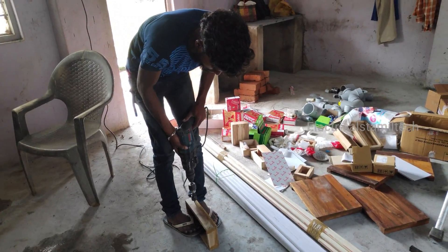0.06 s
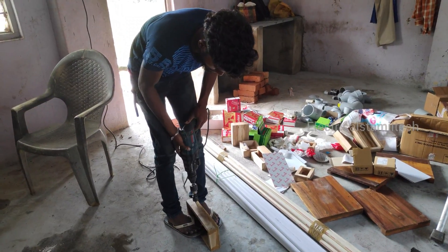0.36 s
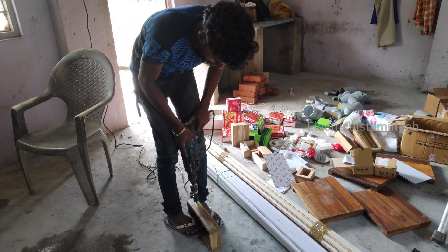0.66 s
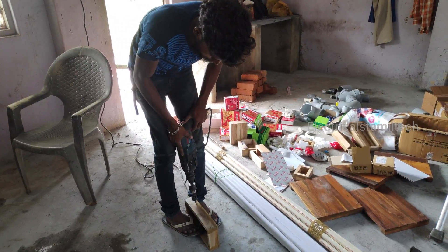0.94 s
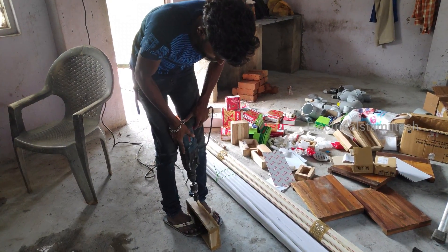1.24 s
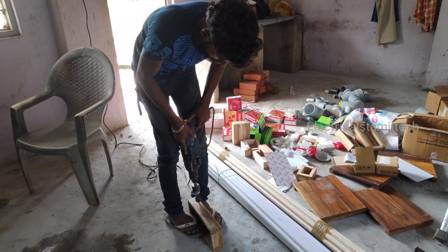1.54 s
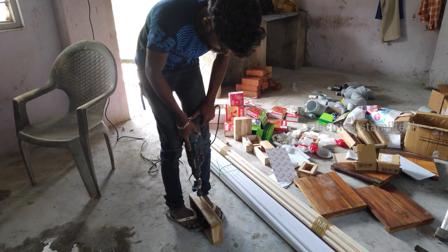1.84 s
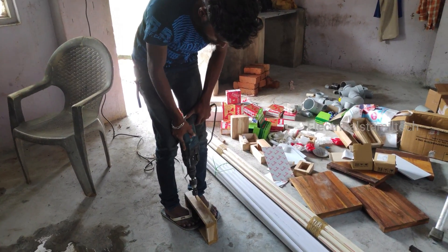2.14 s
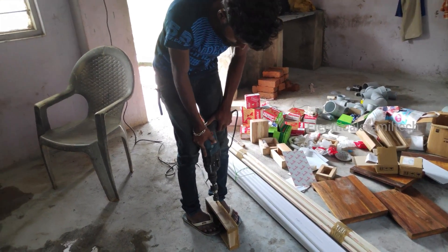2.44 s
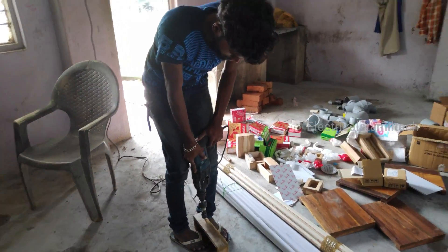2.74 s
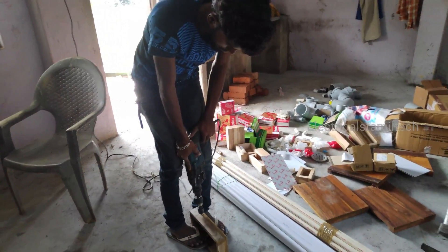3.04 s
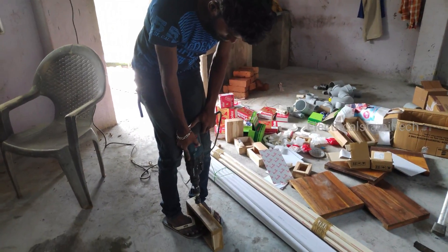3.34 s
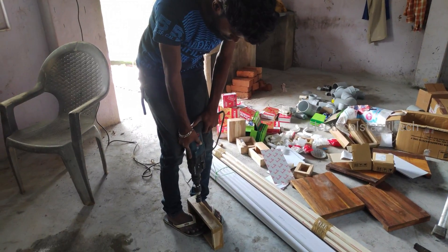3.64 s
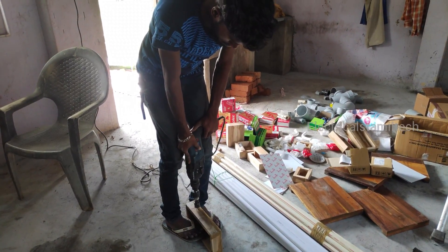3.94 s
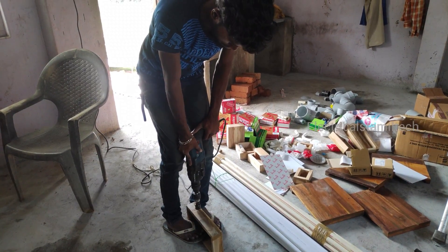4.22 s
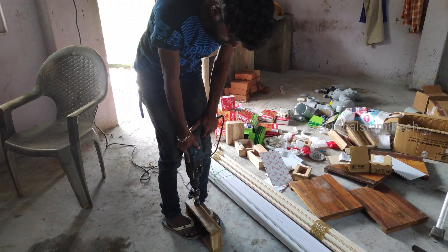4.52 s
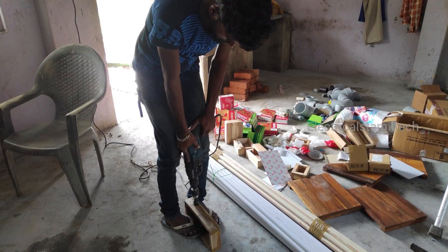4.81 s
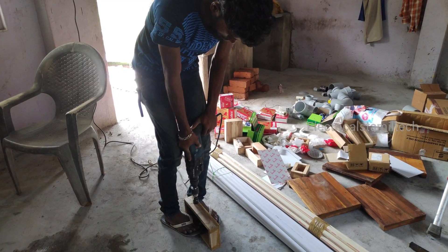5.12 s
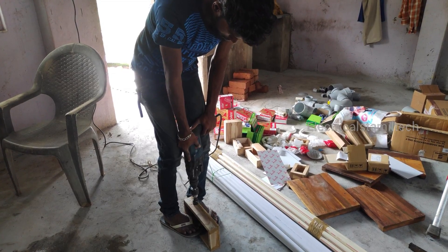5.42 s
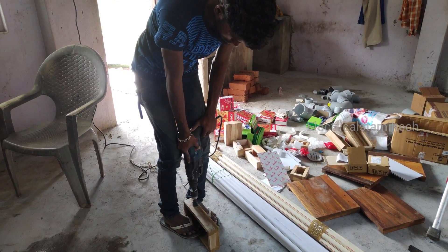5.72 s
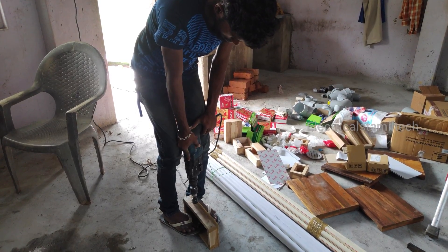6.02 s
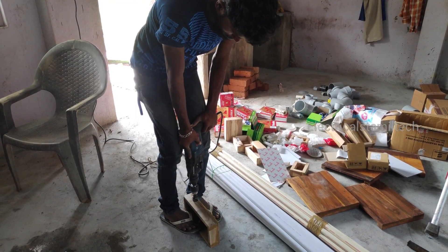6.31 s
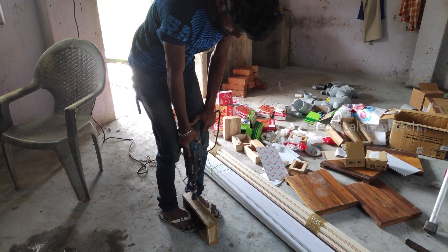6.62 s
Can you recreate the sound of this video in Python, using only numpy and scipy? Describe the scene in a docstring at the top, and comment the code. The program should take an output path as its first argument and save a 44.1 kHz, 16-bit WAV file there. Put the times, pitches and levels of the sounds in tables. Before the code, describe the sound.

Quiet room air and faint hums open in a bare concrete room. At about 0.4 seconds a blip of a corded drill's trigger jerks the gears with a double knock, and the rotor coasts with a soft hiss. Around 1.4 seconds come a soft bump and a few dry, close ticks.

At 1.9 seconds the drill starts with a knock and runs up into a loud whine with rattling gears and hissing air. Its hole saw bites into a plastic box near 2.5 seconds; the pitch sags, recovers with a brief chirp, and sags again around 3.2 seconds. A thin, high squeal passes just before 4 seconds. The teeth rasp on, and the box rings more from about 4.7 seconds. After another dip near 5.3 seconds, the whine holds steady until the end at about 6.8 seconds. The walls give a short reverberation.

```python
"""In a bare concrete room, a corded drill with a hole saw cuts into a plastic box on the floor.
A blip of the trigger jerks the gears and the rotor coasts; then the motor runs up, sags and settles.
Pinion and rotor whine at harmonics of the shaft speed, and slack gear teeth rattle their case.
The saw teeth rasp and excite the modes of the box, brushes and cooling air hiss, a chirp and a squeal
pass. The walls reverberate; dry ticks, quiet room air, faint hums and a soft bump lie beneath."""
import sys
import numpy as np
from scipy import signal
from scipy.fft import rfft, irfft
from scipy.io import wavfile
from scipy.ndimage import uniform_filter1d

SR = 44100
rng = np.random.default_rng(int(sys.argv[2]) if len(sys.argv) > 2 else 0)


def wav_record(signal):
    """Record a signal, one row per channel, as 16-bit PCM in the file named by sys.argv[1]."""
    frames = np.transpose(np.atleast_2d(signal))
    bounded = np.clip(frames, -1, 1)
    # unit amplitude maps onto the largest positive 16-bit level
    quanta = np.round(bounded * 32767).astype(np.int16)
    wavfile.write(sys.argv[1], SR, quanta)


N = 298116
T = np.arange(N) / SR
BINS = np.maximum(np.arange(N // 2 + 1) * SR / N, 1)  # Hz
PINION_TEETH, WHEEL_TEETH = 7, 36
FULL_HZ = 332  # working speed of the shaft

# Motor speed, set by the trigger and the drag of the saw. Each row: time in seconds, shaft speed in Hz.
SHAFT_SPEED = [(1.92, 24.27), (2.25, 283.4), (2.55, 158.4), (2.7, 206.3), (2.94, 343.5), (3.17, 215.8),
               (3.39, 270.6), (3.51, 323.6), (3.61, 317.4), (3.97, 370), (4.12, 306.7), (4.24, 341.7),
               (4.4, 361.3), (4.72, 367.4), (4.85, 353), (5.08, 362.7), (5.19, 299), (5.34, 243.3),
               (5.51, 319), (5.74, 340.1), (5.98, 343), (6.15, 337.1), (6.52, 345.6), (6.76, 346)]
RUN_START_S = SHAFT_SPEED[0][0]
# As the saw sinks in, the box rings more and the gears run steadier.
# Each row: time in seconds, box ring in dB, gear chatter from 0 to 1, change of gear whine in dB.
CUT_PROGRESS = [(2.3, -47, 0.7, 2.5), (3.25, -47, 0.7, -2), (3.6, -38.5, 0.38, -0.5),
                (3.85, -42.5, 0.5, -1.5), (4.68, -34, 0.28, -1.5), (4.82, -30, 0.29, -1.5),
                (5.5, -29, 0.41, 0.7), (5.9, -30, 0, 2.2), (6.45, -30.5, 0.15, 0), (6.76, -31.5, 0, 5.5)]
# Spectrum of scraping and hiss. Each row: frequency in Hz, spectral level in dB.
RASP_SPECTRUM = [(50, -46), (110, -21.5), (400, -11.5), (620, -4), (800, -3.5), (1250, -3), (1650, -6.5),
                 (2100, -2.5), (2600, -1.5), (3100, -7.5), (3600, -10.5), (4900, -5), (5800, -7.5),
                 (7200, -6.5), (9200, -12), (11300, -10), (15500, -18)]
SCRAPE_BAND = 1 / np.sqrt(1 + (BINS / 3000) ** 6)  # scraping lies below 3 kHz, hiss above


def gear_whine(hz, angle, throb=0.27, sway_rad=0.18, blur_hz=100, flutter_db=1.08):
    """Gear meshing: an eccentric wheel modulates the tooth harmonics in amplitude and phase."""
    # Each row: multiple of the shaft speed, level in dB, blur from 0 to 1.
    orders = [(7, -1.5, 0), (14, -19, 1), (21, -17, 1)]
    _, _, gear_db = curves(CUT_PROGRESS)
    chatter, _ = slack(hz)
    wheel = angle * PINION_TEETH / WHEEL_TEETH + 0.26 * wander(5.4)
    mesh = angle + sway_rad * np.sin(wheel + .5) / PINION_TEETH
    tones = sum(undb(db) * partial(k * mesh, blur + 0.95 * chatter, blur_hz, apart=0.95)
                for k, db, blur in orders)
    modulation = (1 + throb * np.cos(wheel)) * undb(gear_db + flutter_db * wander(5.3))
    return tones * modulation * speed_gain(hz, db=-19, db_per_octave=36, limit_hz=298.5, free_db=-26)


def rotor_whine(hz, angle, blur_hz_per_order=50 / 16, smooth_above_hz=310):
    """Periodic forcing: the rotor, its slots and its fan radiate shaft harmonics through the housing."""
    # Each row: multiple of the shaft speed (rounded in use), level in dB, blur from 0 to 1.
    orders = [(0.9988, -27, 0.57), (2, -17.5, 0.3), (3, -32, 0), (4, -15.5, 0), (6, -14.5, 0.6),
              (8, -15, 0.1), (10, -18.5, 0.2), (12, -16.5, 0), (16, -2.5, 0.13), (18, -28, 0.4),
              (20, -13, 0.9), (22, -25, .4), (24, -15, .3), (31, -17, 1), (32, -11.5, 0.56)]
    # Radiation from the housing. Each row: frequency in Hz, gain in dB.
    housing = [(2800, -0.5), (3600, -4), (4120, 3), (4380, -7), (4700, 3.5), (5300, -1.4), (5900, -1.5),
               (7000, -3), (9800, -13.5), (11300, 1)]
    chatter, slowing = slack(hz)
    slow = np.clip(1 - hz / smooth_above_hz, 0, 1)
    uneven = angle + .3 * slow * wander(220)  # a slow rotor turns unevenly, fraying its high partials
    tones = sum(
        undb(db) * partial(round(k) * uneven, blur + 0.12 * chatter, blur_hz_per_order * k, apart=2.07)
        for k, db, blur in orders)
    gain = speed_gain(hz, db=-23.5, db_per_octave=31, limit_hz=313, free_db=-6.5)
    return shape(tones, response(housing)) * gain * undb(-0.4 * slowing)  # softer while slowing


def saw_cut(hz, angle, rasp_from_hz=167):
    """Forced vibration: teeth tear the plastic in tiny bursts that rasp and ring the box, over a hum."""
    # A low hum near half the working shaft speed, then the ringing of the box.
    # Each row: frequency in Hz, bandwidth in Hz, level in dB.
    peaks = [(174.1, 8.5, -12.5), (344, 9.7, 0), (636, 23.5, 5), (678, 21, 2.5), (842, 190, -6.5),
             (991, 18, 6), (1330, 14, -25)]
    ring_db, _, _ = curves(CUT_PROGRESS)
    wheel = angle * PINION_TEETH / WHEEL_TEETH
    bite = undb(wander(14) + np.cos(wheel))
    scrape = unit(shape(wide_noise() * bite, response(RASP_SPECTRUM) * SCRAPE_BAND), (1080, 1400))
    scrape *= speed_gain(hz, db=-38, db_per_octave=5.5, limit_hz=351, free_db=-4.5)
    colour = sum(undb(db) * resonance(peak_hz, width_hz) for peak_hz, width_hz, db in peaks)
    ring = unit(shape(wide_noise() * bite, colour)) * undb(ring_db)
    return (scrape + ring) / (1 + (rasp_from_hz / hz) ** 6)  # slow teeth barely rasp


def brush_hiss(hz, angle, dull_db_per_octave=3):
    """Modulated noise: sparking brushes and cooling air hiss, pulsing twice a shaft turn."""
    sparks = undb(2 * wander(1500) + 0.65 * wander(21) + np.cos(2 * angle))
    colour = response(RASP_SPECTRUM) * np.sqrt(1 - SCRAPE_BAND ** 2)
    hiss = unit(shape(wide_noise() * sparks, colour), (7800, 15000))
    top = shape(hiss, 1 / (1 + (12000 / BINS) ** 8))
    top_gain = undb(-dull_db_per_octave * octaves_below(hz, FULL_HZ))  # a slow motor sounds duller
    hiss += top * (top_gain - 1)
    return hiss * speed_gain(hz, db=-30.5, db_per_octave=9, limit_hz=361, free_db=-6.5)


def gear_rattle(hz, angle, clatter_db=5, case_hz=2340, case_width_hz=690):
    """Backlash: slack teeth clatter once a shaft turn and excite the resonance of the gear case."""
    clatter = wide_noise() * undb(clatter_db * (wander(60) + np.cos(angle)))
    ring = unit(shape(clatter, resonance(case_hz, case_width_hz) ** 2))
    return ring * speed_gain(hz, db=-36.5, db_per_octave=9.5, limit_hz=334, free_db=0.5)


def short_tones(blur=0.93):
    """Narrowband transients swell and fade: a rising chirp, a brief gear chatter and a high squeal."""
    # Each row: start and length in seconds, first and last pitch in Hz, level in dB, blur width in Hz.
    tones = [(2.645, 0.0956, 2310, 2603, -27.5, 88), (3.445, 0.011, 2010, 2050, -17, 250),
             (3.727, 0.3, 5174, 5170, -21.5, 150.6)]
    out = np.zeros((2, N))
    for start_s, length_s, first_hz, last_hz, db, width_hz in tones:
        progress = np.clip((T - start_s) / length_s, 0, 1)
        hz = first_hz + (last_hz - first_hz) * progress
        tone = partial(2 * np.pi * np.cumsum(hz) / SR, blur, width_hz, apart=0.79)
        out += tone * undb(db) * np.sin(np.pi * progress)
    return out


def gear_jerks(knock_t60_s=0.048, body_db=-6):
    """Impact excitation: each start slams the teeth together, and body and cutter ring freely."""
    # Each row: start in seconds, level in dB, treble gain in dB, relative level of the ping in dB.
    impacts = [(.408, -35.5, -14, -40), (.468, -28.5, -5, -11), (1.915, -27.5, 0, -24),
               (1.936, -30.5, -1, -24)]
    # Each row: frequency in Hz, spectral level in dB.
    knock_spectrum = [(60, -12.5), (130, -4.5), (420, -1), (660, 4.5), (1000, -12), (1600, -5), (2400, -4),
                      (3300, -10.5), (5000, -10.5), (15500, -23.5)]
    # Drill body and steel cutter. Each row: frequency in Hz, level in dB, T60 in seconds.
    body_modes = [(520, -9, .4), (673, -7, .3), (964, -11, .15), (2379, -7, .25), (2584, -11, .25)]
    cutter_modes = [(10440, 0, 0.24), (15200, -12, .25)]
    noise = unit(shape(wide_noise(), response(knock_spectrum)))
    shake = 1.5 * wander(67)
    out = np.zeros((2, N))
    for start_s, db, treble_db, ping_db in impacts:
        age = np.maximum(T - start_s, 0)
        body = undb(body_db) * free_modes(body_modes, age, shake)
        ping = undb(ping_db) * free_modes(cutter_modes, age, shake)
        blow = (noise * decay(age, knock_t60_s) + body + ping) * (T >= start_s)
        out += undb(db) * shape(blow, response([(1000, 0), (3000, treble_db)]))
    return out


def brush_sizzle(crackle_db=3):
    """Arcing: the brushes give a fine, very high crackle when the current surges."""
    # Each row: time of the peak in seconds, half width in seconds, level in dB.
    surges = [(2.04, 0.11, -43.5), (2.399, .035, -36), (2.7, 0.097, -37)]
    swell = sum(undb(db) * np.exp(-((T - peak_s) / width_s) ** 2) for peak_s, width_s, db in surges)
    crackle = wide_noise() * undb(crackle_db * wander(500))
    return unit(shape(crackle, resonance(14100, 4000) ** 2)) * swell * (T > RUN_START_S)


def coasting_hiss(start_s=.468, peak_s=0.79, peak_db=-52, idle_db=-59.5):
    """Flow and friction noise: air and brushes swell and fade as the rotor turns without power."""
    # Each row: frequency in Hz, spectral level in dB.
    spectrum = [(180, -39), (300, -18), (535, -17), (590, 1), (674, -13), (907, -5), (1620, -10.5),
                (2360, -7), (4350, -12.5), (15500, -16)]
    rise_db_per_s, fall_db_per_s = 11, 21.5
    swell_db = peak_db + np.where(T < peak_s, rise_db_per_s, -fall_db_per_s) * (T - peak_s)
    hiss = unit(shape(wide_noise(), response(spectrum)), (2500, 15000))
    return hiss * undb(np.where(T < start_s, idle_db, swell_db) + .5 * wander(20))


def ticks(decay_s=0.001):
    """Damped transients: tiny noise bursts click close by, as direct sound alone."""
    # Each row: start in seconds, peak level in dB, centre frequency in Hz, left minus right in dB.
    clicks = [(1.4605, -27, 7500, 1.5), (1.5422, -32.5, 13000, 2), (1.6152, -39, 10000, -2),
              (1.6836, -26.5, 6800, -3), (1.6885, -35, 10000, 1), (1.7035, -35, 12000, -1),
              (1.7795, -42, 4600, -4)]
    out = np.zeros((2, N))
    for start_s, db, hz, pan_db in clicks:
        burst = rng.standard_normal((2, N)) * np.exp(-np.abs(T - start_s) / decay_s) * (T >= start_s)
        click = shape(burst, resonance(hz, 1.4 * hz) ** 2)
        out += click / np.abs(click).max() * undb(db + np.array([[pan_db], [-pan_db]]) / 2)
    return out


def background(air_db=-53, floor_db=-71.5):
    """Ambient noise: broadband room air lies under two faint low hums and one soft, low bump."""
    # Each row: frequency in Hz, spectral level in dB.
    air_spectrum = [(15, -32), (25, 3), (71, -5.5), (129, -1.5), (410, -6), (469, -9.5), (552, -5),
                    (666, -10.5), (1050, -7), (1400, -20), (2200, -15), (3200, -29), (4750, -24),
                    (7100, -18), (15500, -40)]
    # Each row: time of the peak in seconds, pitch in Hz, level in dB, fade in dB per second,
    # blur from 0 to 1, blur width in Hz.
    hums_and_bump = [(1.44, 75, -54, 18.5, 0.04, 10), (0.24, 295, -59.5, 22, 0.8, 13),
                     (1.41, 350, -52, 100, 0.9, 250)]
    out = unit(shape(wide_noise(), response(air_spectrum))) * undb(air_db + wander(10))
    for peak_s, hz, db, fade_db_per_s, blur, blur_hz in hums_and_bump:
        swell = undb(db - fade_db_per_s * np.abs(T - peak_s)) + undb(floor_db)
        out += partial(2 * np.pi * hz * T, blur, blur_hz, apart=0.32) * swell
    return out


def room(x, wet_db, t60_s=.8, delay_s=.004):
    """Diffuse reverberation: concrete walls return a dense tail whose treble dies sooner."""
    noise = rng.standard_normal((2, N))
    low = shape(noise, 1 / (1 + (BINS / 4000) ** 2))
    age = np.maximum(T - delay_s, 0)
    fade = decay(age, t60_s)
    tail = (low * fade + 1.51 * (noise - low) * fade ** 1.68) * (age > 0) / np.sqrt(np.sum(fade ** 2))
    wet = signal.fftconvolve(x, tail[:, :SR], axes=1)[:, :N]
    return (x + undb(wet_db) * wet) / np.sqrt(1 + undb(wet_db) ** 2)


def slack(hz):
    """Backlash grows as speed is lost: returns chatter from 0 to 1 and slowing in octaves a second."""
    _, chatter, _ = curves(CUT_PROGRESS)
    lost = octaves_below(hz, FULL_HZ)
    slowing = np.maximum(np.gradient(lost) * SR, 0)
    return np.clip(chatter + 0.27 * lost + 0.31 * slowing, 0, 1), slowing


def speed_gain(hz, db, db_per_octave, limit_hz, free_db, bite_s=2.45, bite_rise_s=0.17):
    """Power law: level grows with speed up to a limit, offset by free_db until the saw bites."""
    free = np.clip(1 - (T - bite_s) / bite_rise_s, 0, 1)
    running = np.clip((T - RUN_START_S) / .02, 0, 1)
    return running * undb(db - db_per_octave * octaves_below(hz, limit_hz) + free_db * free)


def partial(phase, blur, blur_hz, apart):
    """Line broadening: a share of a tone's power spreads into a band, partly unlike in each channel."""
    blur = np.clip(blur, 0, 1)
    shared, left, right = (wander(blur_hz) + 1j * wander(blur_hz) for _ in range(3))
    smear = (shared + apart * np.array([left, right])) / np.sqrt(1 + apart ** 2)
    turn = 0.4 * apart * wander(0.87) * np.array([[1], [-1]])  # standing waves turn the stereo phase
    return np.real((np.sqrt(2 * (1 - blur)) + np.sqrt(blur) * smear) * np.exp(1j * (phase + turn)))


def wide_noise():
    """Spatial coherence: stereo noise is alike in the bass and unrelated in the treble."""
    # Each row: frequency in Hz, side minus mid in dB.
    stereo_width = [(100, -37), (380, -12), (700, -12.5), (1290, 1), (2400, -3), (5000, 0)]
    mid, side = rng.standard_normal((2, N))
    side = shape(side, response(stereo_width))
    return np.array([mid + side, mid - side])


def free_modes(modes, age, shake):
    """Free vibration: a sum of damped sines with a common phase jitter."""
    return sum(undb(db) * decay(age, t60_s) * np.sin(2 * np.pi * hz * age + shake)
               for hz, db, t60_s in modes)


def decay(age, t60_s):
    """Exponential damping: 60 dB down after t60_s."""
    return np.exp(-np.log(1000) * age / t60_s)


def resonance(hz, width_hz):
    """Response of a damped oscillator, 1 at its centre."""
    return 1 / (1 + 1j * (BINS ** 2 - hz ** 2) / (BINS * width_hz))


def wander(rate_hz):
    """Random drift: low-passed noise with standard deviation 1."""
    drift = shape(rng.standard_normal(N), 1 / (1 + (BINS / rate_hz) ** 2))
    return drift / drift.std()


def response(points):
    """Frequency response interpolated from (Hz, dB) points."""
    hz, db = np.transpose(points)
    return undb(np.interp(np.log(BINS), np.log(hz), db))


def shape(x, gain):
    """Linear filtering by a gain per frequency."""
    return irfft(rfft(x) * gain, N)


def unit(x, band_hz=(0, SR)):
    """Normalise a stereo pair so that its mid signal has rms 1 within a band."""
    return x / np.std(shape(x.mean(0), (BINS > band_hz[0]) & (BINS < band_hz[1])))


def curves(table):
    """Interpolate each column of a time table to every sample."""
    times, *columns = np.transpose(table)
    return [np.interp(T, times, column) for column in columns]


def octaves_below(hz, limit_hz):
    """Shortfall of speed in octaves, 0 above the limit."""
    return np.maximum(np.log2(limit_hz / hz), 0)


def undb(db):
    """Decibels to amplitude ratio."""
    return 10 ** (np.asarray(db) / 20)


def scene(inertia_s=0.0656):
    """Superposition: one shaft drives gears, rotor and saw; inertia rounds each change of speed."""
    hz = uniform_filter1d(curves(SHAFT_SPEED)[0], int(inertia_s * SR))
    angle = 2 * np.pi * np.cumsum(hz * (1 + 0.00149 * wander(14.3))) / SR  # the load makes it waver
    motor = room(gear_whine(hz, angle) + rotor_whine(hz, angle) + gear_rattle(hz, angle), wet_db=-2)
    cut = room(saw_cut(hz, angle) + brush_hiss(hz, angle) + short_tones() + brush_sizzle(), wet_db=-5)
    knocks = room(gear_jerks(), wet_db=1)
    return motor + cut + knocks + ticks() + coasting_hiss() + background()


def record(dry, top_hz=16000):
    """Microphone response: two ports colour the treble differently, and a low-pass cuts the top."""
    # Each row: frequency in Hz, left minus right in dB.
    port_balance = [(700, 1), (2400, 0), (4400, -3.5), (7200, -5.5), (9500, 0.5), (12000, 7.5), (15000, 10)]
    tilt = response(port_balance)
    ports = np.array([tilt, np.ones_like(tilt)]) * np.sqrt(2 / (1 + tilt ** 2))  # constant total power
    taps = np.roll(irfft(ports, N), 32, axis=1)[:, :65]
    coloured = signal.fftconvolve(dry, taps, mode="same", axes=1)
    return signal.sosfilt(signal.ellip(10, .2, 70, top_hz, fs=SR, output="sos"), coloured)


dry = scene()
out = record(dry)
wav_record(out)
```